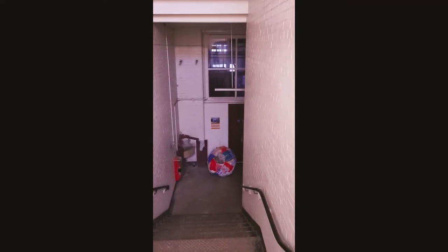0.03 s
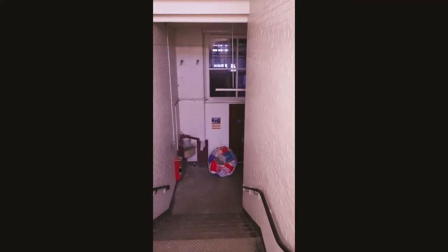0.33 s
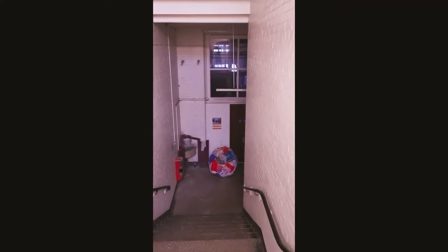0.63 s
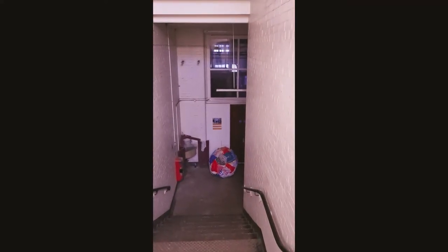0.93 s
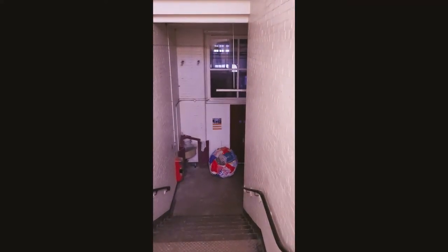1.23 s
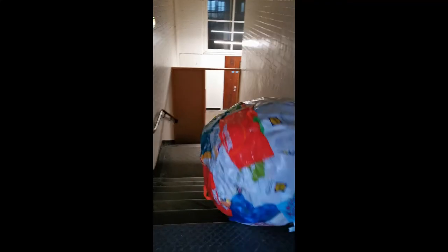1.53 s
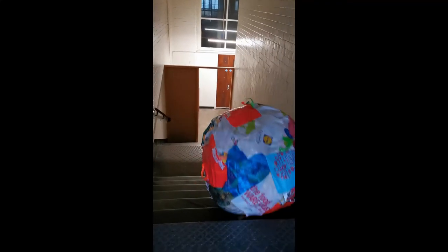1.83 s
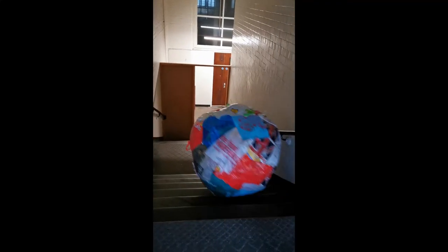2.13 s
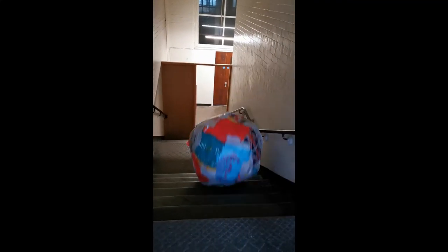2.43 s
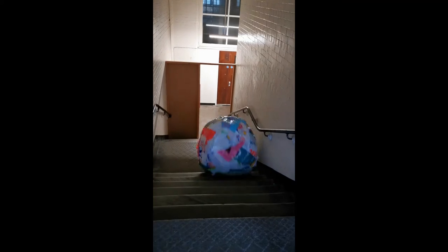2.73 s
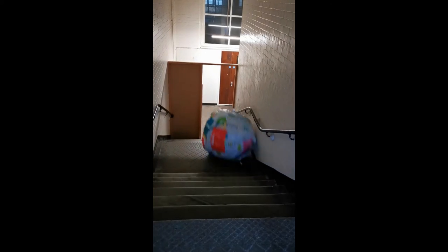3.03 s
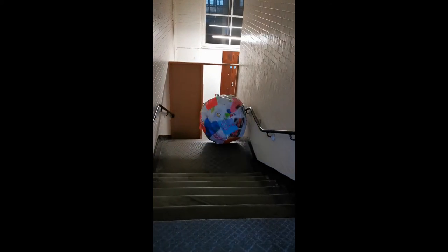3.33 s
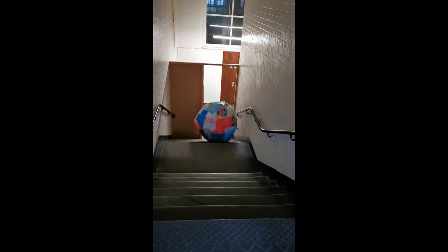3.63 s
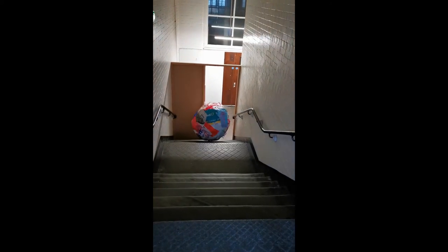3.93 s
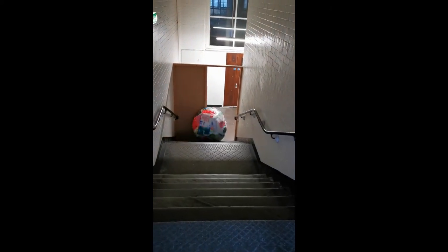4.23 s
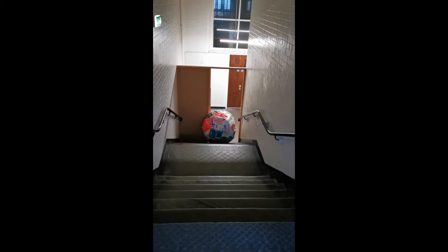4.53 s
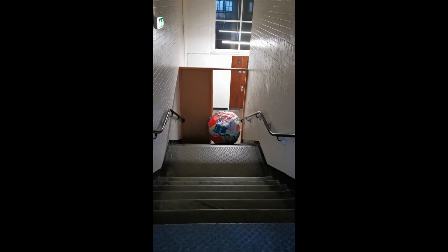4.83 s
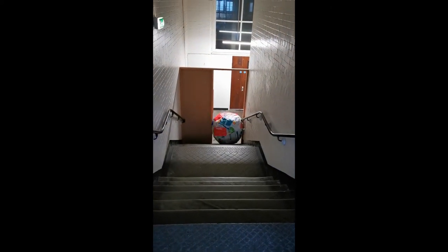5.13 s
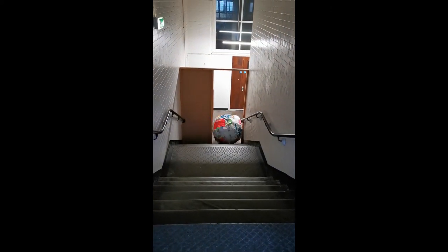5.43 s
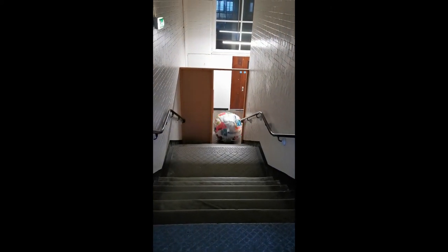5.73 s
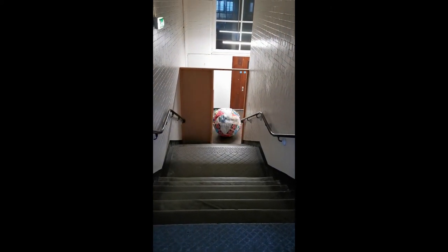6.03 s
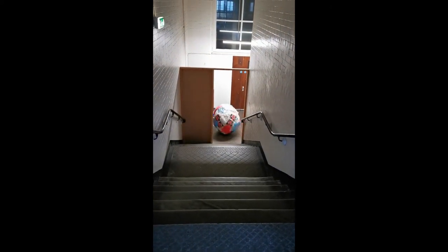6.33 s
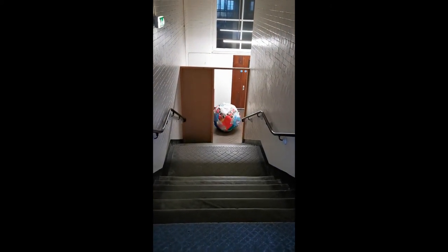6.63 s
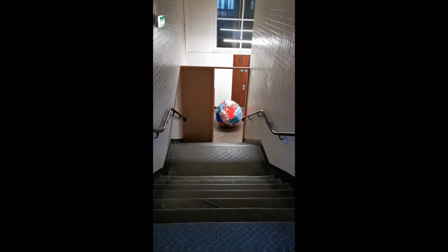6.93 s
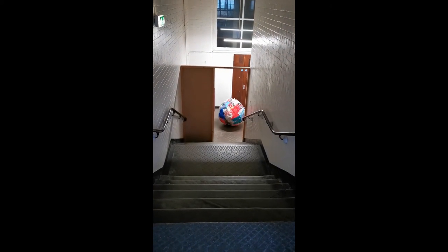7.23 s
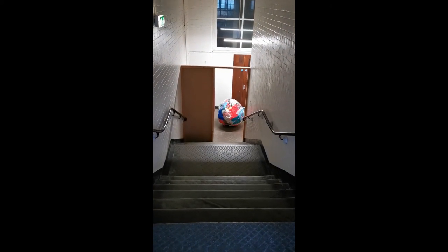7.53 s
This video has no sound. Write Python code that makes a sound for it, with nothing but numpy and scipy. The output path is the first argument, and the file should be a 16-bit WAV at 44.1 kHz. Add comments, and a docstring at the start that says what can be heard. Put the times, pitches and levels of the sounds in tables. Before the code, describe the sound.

Crackling plastic and hollow thumps echo through a bare stairwell as a large, light, bag-covered ball tumbles away down the steps.

```python
"""A big inflated ball covered in plastic bags rolls and bounces down a bare stairwell. Impacts on step edges
excite the modes of the air inside it and of its taut skin. Under its weight the cover drums and buckles in
trains of random clicks, and loose flaps rustle. Heard from the top landing, the ball first rolls faintly away
from the microphone; the sound drops out briefly, then the ball is close by and tumbles away, its direct crackle
sinking into the reverberation. The building rumbles faintly."""
import sys
import numpy as np
from scipy import signal
from scipy.fft import rfft, irfft
from scipy.io import wavfile
from scipy.ndimage import uniform_filter1d

SR = 44100
rng = np.random.default_rng(int(sys.argv[2]) if len(sys.argv) > 2 else 0)


def store_wav(level_fs):
    """Save 16-bit WAV to argv[1]."""
    pcm = np.round(np.clip(np.atleast_2d(level_fs), -1, 1) * 32767)
    wavfile.write(sys.argv[1], SR, pcm.T.astype(np.int16))


N = 338688
PORT_SPACING_S = 0.00046  # travel time of sound between the two microphone ports


def ball_cover(distance_m, patches=3):
    """Spherical spreading: the cover's direct sound falls as 1 / distance, its reverberation does not."""
    gains = cover_gains()
    direct_gain = undb(-3.5) / np.maximum(distance_m, .5)
    out = 0
    for lag_s in np.linspace(0, PORT_SPACING_S, patches):
        drum, plastic = cover_patch(*gains)
        plastic = treble_loss(plastic, distance_m, edge_hz=9500, db_per_m=1.0)
        # the ball is wide, so each patch reaches the two ports with its own lag
        crackle = np.vstack([plastic, np.roll(plastic, int(lag_s * SR))])
        out = out + (drum + crackle) * direct_gain + reverberation(drum + plastic)
    return out / np.sqrt(patches)


# Spectra of the tapped skin, crushed plastic and brushing flaps.
# Each row: frequency in Hz, relative spectral density in dB.
DRUM_SPECTRUM = [(20, -10), (35, -3), (55, -9.5), (90, -5), (120, -1.5), (155, 0.5), (185, -4.5),
                 (215, -3.5), (295, 0), (370, -6), (550, -5), (800, -12), (1200, -18.5), (2500, -41)]
CRUMPLE_SPECTRUM = [(25, 3), (55, 3), (100, -1), (300, -2), (420, -3), (700, 0), (1000, 1), (1250, -2.5),
                    (2250, -3), (2900, -10), (5000, -9), (6900, -15), (8000, -19.5), (15000, -32)]
RUSTLE_SPECTRUM = [(800, -17.5), (2200, -3), (3000, -4), (5200, 1), (6000, -1.5), (6900, 1.5), (7600, -5.5),
                   (8900, -1.5), (9900, -4.5), (10800, 0.5), (11800, -4.5), (13200, -3), (14300, -14),
                   (16000, -9.5)]

def cover_patch(drum_gain, crumple_gain, rustle_gain):
    """Source and filter: click trains take on the spectra of skin, crushed plastic and flaps."""
    taps = buckling(per_s=200, spread_db=4.5, flurry_db=3, flurries_per_s=35)
    creases = buckling(per_s=600, spread_db=6, flurry_db=3.5, flurries_per_s=55)
    flicks = buckling(per_s=750, spread_db=7.5, flurry_db=2.5, flurries_per_s=90)
    drum = unit_rms(colour(taps, DRUM_SPECTRUM)) * drum_gain
    crumple = unit_rms(colour(creases, CRUMPLE_SPECTRUM)) * crumple_gain
    rustle = unit_rms(colour(flicks, RUSTLE_SPECTRUM)) * rustle_gain
    return drum, crumple + rustle


def buckling(per_s, spread_db, flurry_db, flurries_per_s, count=16384):
    """Thin plastic buckles in impulses of log-normal size: many small, a few large, in flurries."""
    onsets, sign = rng.integers(0, N, count), rng.choice([-1, 1], count)
    scatter, flurries = np.clip(rng.standard_normal((2, count)), -2.2, 2.2)
    flurry = np.interp(onsets / SR * flurries_per_s, np.arange(count), flurries)
    size = undb(spread_db * scatter + flurry_db * flurry)
    active = np.arange(count) < per_s * N / SR
    return np.bincount(onsets, active * sign * size, N)[None]


def cover_gains():
    """Incoherent sources add in power: rolling and landings are summed so, then slaps join the crumple."""
    t = np.arange(0, N / SR, .001)
    drum, crumple, rustle = np.sqrt(rolling(t) + landings(t))
    crumple = crumple + slaps(t, rise_s=.004, fade_s=0.012)
    return curves(np.c_[t, drum, crumple, rustle])


# How briskly the ball rolls. Each row: time in seconds, crumpling level in dB.
ROLL_LEVELS = [(0.0, -58), (0.5, -64), (0.95, -71), (1.3, -67), (1.375, -51.5), (1.76, -58.5), (1.9, -43.5),
               (2.54, -42.5), (2.66, -57), (3.2, -44), (3.6, -50), (4.05, -54), (4.6, -42.5), (4.9, -43),
               (5.3, -49), (5.7, -44.5), (6.5, -56.5), (7.0, -54.5), (7.68, -60.5)]
# Folds passing under the ball. Each row: start and length in seconds, crumpling and rustle in dB.
COVER_FOLDS = [(0.10, .28, -61, -63), (0.61, 0.14, -62, -64), (1.47, 0.11, -56, -54.5),
               (1.805, .22, -39, -43), (2.122, 0.35, -44.5, -40.5), (2.42, .2, -48, -39),
               (2.79, .15, -33, -40), (2.922, 0.16, -35, -40), (3.10, .2, -38, -49),
               (3.311, .21, -46, -35.5), (4.146, 0.15, -30, -40), (4.527, .22, -39.5, -44),
               (4.84, 0.17, -49, -45), (4.983, 0.47, -52, -40), (5.248, 0.45, -39, -33.5),
               (5.759, 0.19, -40, -53), (5.933, 0.21, -47.5, -67.5), (6.099, 0.19, -48.5, -57.5),
               (6.57, 0.085, -59, -55.5), (6.623, 0.24, -50, -52), (6.814, .18, -42, -48),
               (7.183, 0.24, -54, -56), (7.556, .12, -59, -60.5)]

def rolling(t):
    """Rolling contact feeds power to drumming, crumpling and rustle, with a swell for each fold."""
    roll_db = np.interp(t, *np.transpose(ROLL_LEVELS))
    power = undb(roll_db + np.c_[[-3.5, 0, -10.5]]) ** 2  # drum, crumple, rustle
    for start_s, length_s, crumple_db, rustle_db in COVER_FOLDS:
        swell = np.sin(np.pi * np.clip((t - start_s) / length_s, 0, 1))
        drum_db = crumple_db - 4
        power += (undb(np.c_[[drum_db, crumple_db, rustle_db]]) * swell) ** 2
    return power


# Landings on steps, floor and door. Each row: start, squeeze time and hold time in seconds,
# levels of drumming, crumpling, rustle and thump in dB, thump pitch in Hz.
BALL_LANDINGS = [(1.784, 0.0099, .09, -31, -42, -53, -29, 130),
                 (2.015, .014, 0.13, -31, -37, -38.5, -29.5, 60),
                 (2.318, .016, 0.21, -30.5, -37, -41, -26, 273),
                 (2.724, .012, .08, -34.5, -42, -45.5, -31, 172),
                 (2.777, .028, 0.1, -33, -39, -46, -23.5, 272),
                 (3.018, .046, 0.061, -28.5, -29.5, -37.5, -25, 59),
                 (3.308, .021, .09, -34.5, -39, -40, -30, 280),
                 (3.628, 0.012, 0.099, -36.5, -44, -48.5, -35, 165),
                 (3.738, 0.0044, 0.082, -24.5, -31, -42, -27, 45),
                 (4.130, 0.0161, 0.19, -27, -30, -34.5, -22.5, 200),
                 (4.294, 0.03405, 0.042, -27, -25, -27, -16.5, 126),
                 (4.420, 0.036, .11, -29.5, -29.5, -38, -30, 260),
                 (4.790, .060, .22, -40, -50, -57, -40, 150),
                 (5.165, .009, 0.063, -42, -48, -45, -30.5, 173),
                 (5.616, 0.0097, 0.053, -39.5, -46, -50, -26.5, 197)]

def landings(t, sag_db_per_s=35, lift_db_per_s=262, flap_inertia_s=0.012):
    """Noise power follows the contact load: it rises in the squeeze, sags in the hold, dies at lift-off."""
    power = 0
    for start_s, squeeze_s, hold_s, drum_db, crumple_db, rustle_db, _, _ in BALL_LANDINGS:
        age = t - start_s
        pressed_s = np.maximum(age - squeeze_s, 0)
        lifted_s = np.maximum(age - squeeze_s - hold_s, 0)
        rise_s = squeeze_s + np.c_[[0, 0, flap_inertia_s]]  # loose flaps respond more slowly
        decay = undb(-sag_db_per_s * pressed_s - lift_db_per_s * lifted_s)
        load = np.clip(age / rise_s, 0, 1) * decay ** 2
        power = power + undb(np.c_[[drum_db, crumple_db, rustle_db]]) ** 2 * load
    return power


# The cover slapped flat or caught on the floor. Each row: start in seconds, level in dB.
COVER_SLAPS = [(1.785, -38), (2.018, -23.5), (3.741, -26), (4.135, -41), (4.192, -27), (4.312, -19),
               (5.435, -38), (6.577, -49), (6.69, -44)]

def slaps(t, rise_s, fade_s):
    """A hard contact is a transient: the crumpling gain jumps, then decays as the ball flattens."""
    return sum(undb(db) * np.clip((t - start_s) / rise_s, 0, 1) * np.exp(-abs(t - start_s) / fade_s)
               for start_s, db in COVER_SLAPS)


# Modes of the bounce, enclosed air and taut skin. Each row: frequency in Hz, level in dB, T60 in seconds.
BALL_RESONANCES = [(44, 4, 0.13), (57, 1, 0.15), (81, -1.5, 0.11), (117.3, -0.5, 0.1), (159.3, 2.5, 0.1),
                   (218.6, 0, 0.12), (256, -1, 0.11), (303.2, 1, 0.14), (371.7, -1, 0.11),
                   (458, 2.5, 0.076), (543, 1, 0.083), (703, 0, 0.054), (820, -6, .06), (990, -2, .08)]
# Short pitched thuds of the ball; several close together make one hard, broad thump.
# Each row: start in seconds, level in dB, pitch in Hz.
BALL_THUDS = [(1.838, -32, 550), (1.912, -25.5, 600), (2.05, -30.5, 62), (2.409, -26.5, 230),
              (2.87, -30, 277), (3.385, -33.5, 308), (3.752, -27, 930), (3.769, -28, 149),
              (3.785, -28, 314), (3.89, -26, 289), (4.229, -22.5, 170), (4.379, -21, 253), (5.438, -30, 95),
              (5.539, -32.5, 138), (5.654, -29, 190), (5.699, -34, 124), (6.694, -46, 165),
              (6.748, -45, 183), (6.872, -40, 142), (6.899, -38, 114), (7.627, -48, 125)]

def ball_thumps(mode_span_octaves, contact_s, size=8192):
    """Modal ringing: each thud, and each landing at its deepest squeeze, excites modes near its pitch."""
    t = np.arange(size) / SR
    hz, db, t60 = np.transpose(BALL_RESONANCES)[:, :, None]
    envelope = undb(db) * np.exp(-np.log(1000) * t / t60) * (1 - np.exp(-t / contact_s))
    blows = [(start_s + squeeze_s, thump_db, pitch_hz)
             for start_s, squeeze_s, *_, thump_db, pitch_hz in BALL_LANDINGS]
    out = np.zeros(N + size)
    for start_s, level_db, pitch_hz in blows + BALL_THUDS:
        detune = 1 + 0.027 * rng.standard_normal(hz.shape)  # a dented ball rings slightly off pitch
        excitation = np.exp(-.5 * (np.log2(hz / pitch_hz) / mode_span_octaves) ** 2)
        ring = np.sum(excitation * envelope * np.sin(2 * np.pi * hz * detune * t), axis=0)
        start = int(start_s * SR)
        out[start:start + size] += undb(level_db) * ring / abs(ring).max()
    return out[None, :N]


# Creases snapping close by as the ball is set rolling. Each row: time in seconds, impulse level in dB.
CREASE_SNAPS = [(1.432, -29.5), (1.484, -31.5), (1.5465, -24), (1.656, -27)]

def crease_snaps():
    """A single buckling crease is an impulse, filtered by the spectrum of the plastic flaps."""
    impulses = np.zeros((1, N))
    for time_s, db in CREASE_SNAPS:
        impulses[0, int(time_s * SR)] += undb(db)
    return colour(impulses, RUSTLE_SPECTRUM)


def treble_loss(x, distance_m, edge_hz, db_per_m):
    """Treble attenuates with range: it is weaker beyond the mean distance and stronger within it."""
    low = signal.sosfiltfilt(signal.butter(2, edge_hz, fs=SR, output="sos"), x)
    return low + (x - low) * undb(-db_per_m * (distance_m - np.mean(distance_m)))


def reverberation(x):
    """Convolution with a fresh room response: each spot on the ball has its own paths round the shaft."""
    room = stairwell_response(early_power_ratio=3.3, early_t60_s=0.24, first_wall_s=.002)
    return signal.fftconvolve(x, room, axes=1)[:, :N]


# Reverberation time of the stairwell. Each row: frequency in Hz, T60 in seconds.
STAIRWELL_T60 = [(60, 0.72), (250, 0.97), (1000, 1.12), (2500, 1.02), (5000, 0.79), (9000, 0.57),
                 (15000, 0.21)]

def stairwell_response(early_power_ratio, early_t60_s, first_wall_s, size=49152, bands=8):
    """Reflections decay exponentially: a burst from close walls, then a tail whose treble dies first."""
    t = np.arange(size) / SR
    hz, noise = diffuse_field(size)
    centres_hz = np.geomspace(200, 15000, bands)
    early = early_power_ratio * 10 ** (-6 * t / early_t60_s)
    response = 0
    for centre_hz, weights in zip(centres_hz, np.eye(bands)):
        band = irfft(noise * at_hz(np.c_[centres_hz, weights], hz))
        tail = 10 ** (-6 * t / at_hz(STAIRWELL_T60, centre_hz))
        power = (early + tail) * (t > first_wall_s)
        response = response + band * np.sqrt(power / power.sum())
    # the many room modes share the energy evenly over neighbouring bands
    spectrum = rfft(response)
    smooth_power = uniform_filter1d(np.mean(abs(spectrum) ** 2, axis=0), size=50)
    return irfft(spectrum / np.sqrt(smooth_power))[:, :size - size // 8]


def diffuse_field(size):
    """Spectra of noise from all sides at two close ports: coherent in the bass, unrelated in the treble."""
    hz = np.fft.rfftfreq(size, 1 / SR)
    coherence = .96 * np.sinc(2 * hz * PORT_SPACING_S) / (1 + (hz * PORT_SPACING_S) ** 2)
    mid, side = rfft(rng.standard_normal((2, size)))
    mid, side = mid * np.sqrt(1 + coherence), side * np.sqrt(1 - coherence)
    return hz, np.array([mid + side, mid - side])


# The building's background noise. Each row: frequency in Hz, relative spectral density in dB.
RUMBLE_SPECTRUM = [(20, -3), (50, -2.5), (140, 3.5), (300, -18), (1000, -18.5), (3000, -21), (8000, -33),
                   (16000, -30)]

def building_rumble(level_db):
    """A steady diffuse field, strongest in the bass, is heard as a faint rumble."""
    _, noise = diffuse_field(N)
    return undb(level_db) * unit_rms(colour(irfft(noise), RUMBLE_SPECTRUM))


def colour(x, spectrum, size=4096):
    """Minimum-phase filter: folding the cepstrum gives a causal response with the given spectrum."""
    gain = undb(at_hz(spectrum, np.fft.rfftfreq(size, 1 / SR)))
    cepstrum = irfft(np.log(gain))
    cepstrum[1:size // 2] *= 2
    cepstrum[size // 2 + 1:] = 0
    response = irfft(np.exp(rfft(cepstrum)))
    return signal.oaconvolve(x, response[None], axes=1)[:, :N]


def at_hz(table, hz):
    """Interpolate a table on a log-frequency axis."""
    points, values = np.transpose(table)
    return np.interp(np.log(np.maximum(hz, 1)), np.log(points), values)


def curves(table):
    """Interpolate the columns of a timed table to one value a sample."""
    times_s, *columns = np.transpose(table)
    return [np.interp(np.arange(N) / SR, times_s, column) for column in columns]


def undb(db):
    """Decibels to amplitude ratio."""
    return 10 ** (np.asarray(db) / 20)


def unit_rms(x):
    """Scale to rms 1."""
    return x / np.sqrt(np.mean(x ** 2))


# The ball's way down. Each row: time in seconds, distance in metres, left minus right level in dB.
BALL_PATH = [(0, 1.3, 1), (1.3, 7, 1), (1.36, 1.6, -1.2), (2, 1.42, -2), (3, 2.9, -1), (4, 4.5, -.2),
             (7.7, 5.9, .8)]

def scene():
    """Superposition: cover, thumps and snaps with their reverberation, over the building's rumble."""
    distance_m, pan_db = curves(BALL_PATH)
    thumps = ball_thumps(mode_span_octaves=0.49, contact_s=0.0051)
    snaps = crease_snaps()
    direct = thumps + undb([[-7], [0]]) * snaps  # the snaps lie to the right
    ball = ball_cover(distance_m) + direct + reverberation(undb(0.9) * thumps + undb(2) * snaps)
    return ball * undb([pan_db / 2, -pan_db / 2]) + building_rumble(level_db=-64)


# Balance of the two microphone ports. Each row: frequency in Hz, left minus right level in dB.
PORT_BALANCE = [(60, 3), (120, 2), (200, 1), (400, -2), (1200, -4), (2400, -3.5), (4400, -4), (8100, -2.5),
                (13000, -7)]
# The sound drops out briefly. Each row: time in seconds, gain in dB.
DROPOUT_GAIN = [(1.295, 0.5), (1.305, -27), (1.335, -43), (1.36, -25), (1.385, 0.5)]

def record(dry):
    """Each port has its own frequency response; the level drops out once and a low-pass cuts the top."""
    left = colour(dry[:1], [(hz, db / 2) for hz, db in PORT_BALANCE])
    right = colour(dry[1:], [(hz, -db / 2) for hz, db in PORT_BALANCE])
    sound = np.vstack([left, right]) * undb(curves(DROPOUT_GAIN)[0])
    low_pass = signal.ellip(10, .2, 80, 15600, fs=SR, output="sos")
    return signal.sosfilt(low_pass, sound)


dry = scene()
out = record(dry)
store_wav(out)
```